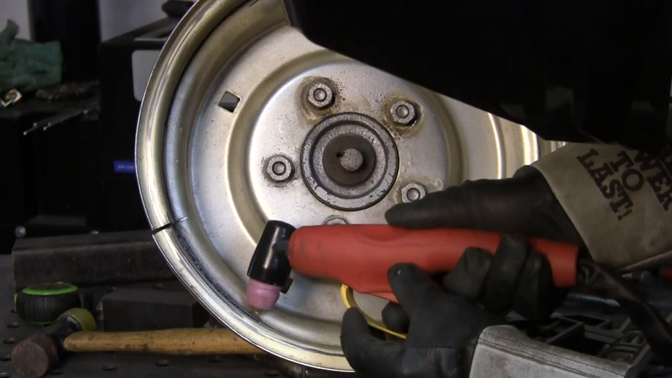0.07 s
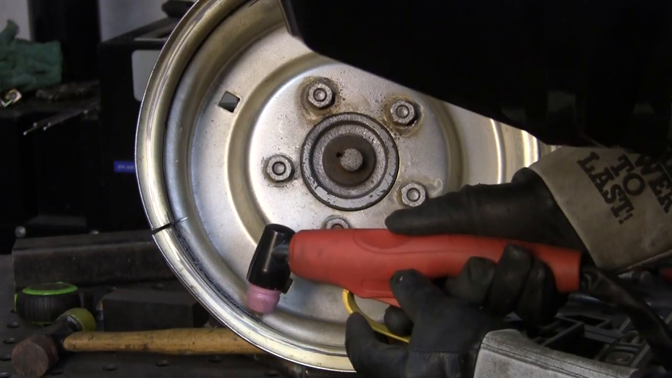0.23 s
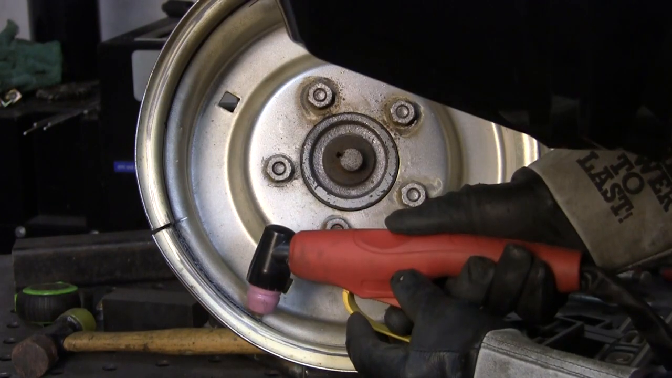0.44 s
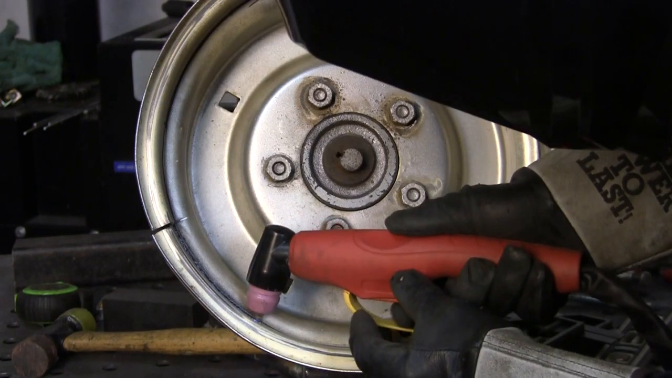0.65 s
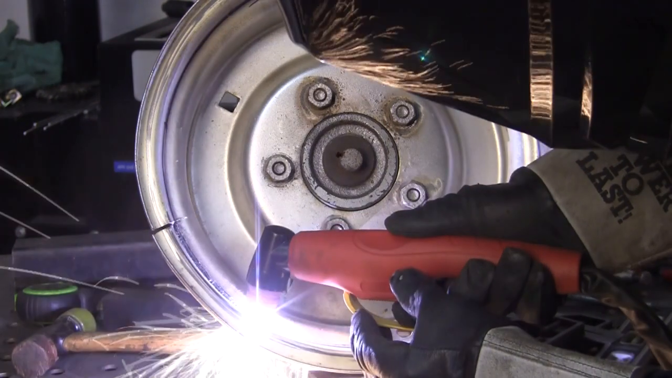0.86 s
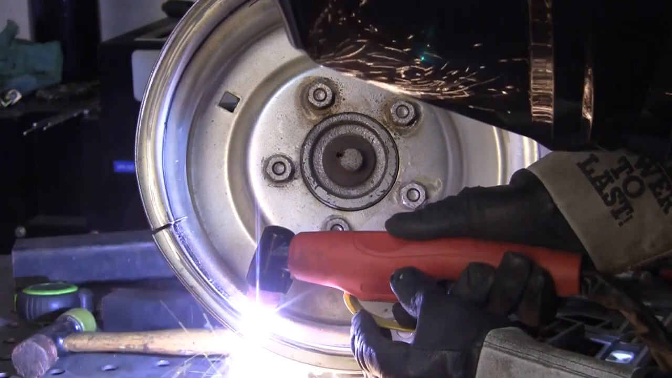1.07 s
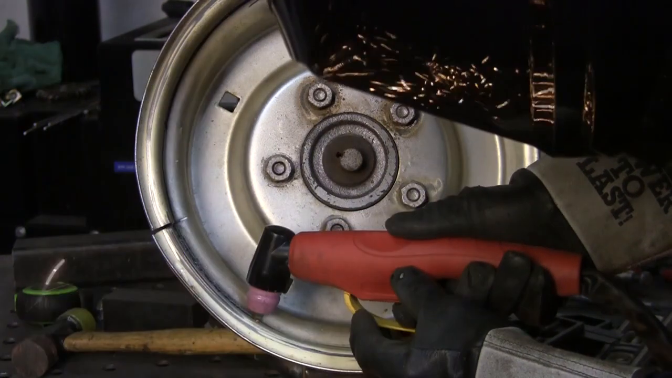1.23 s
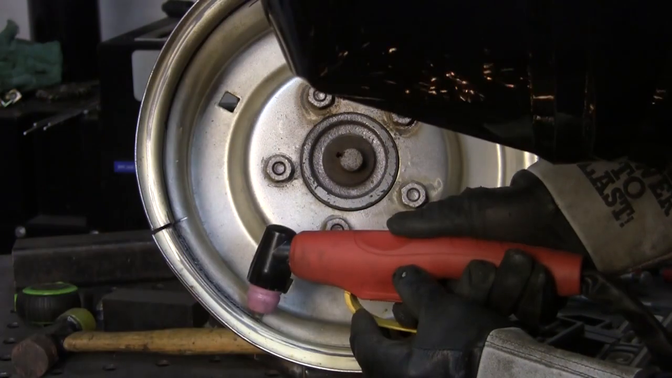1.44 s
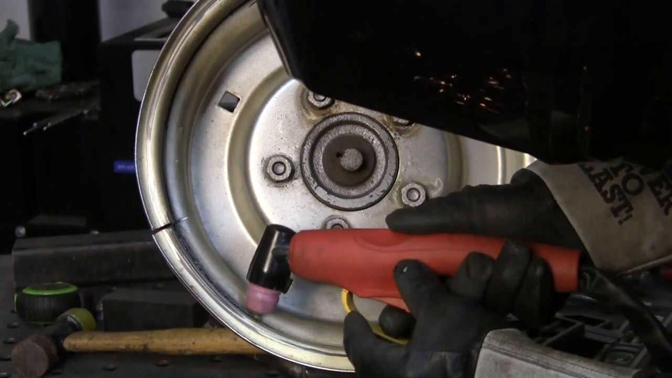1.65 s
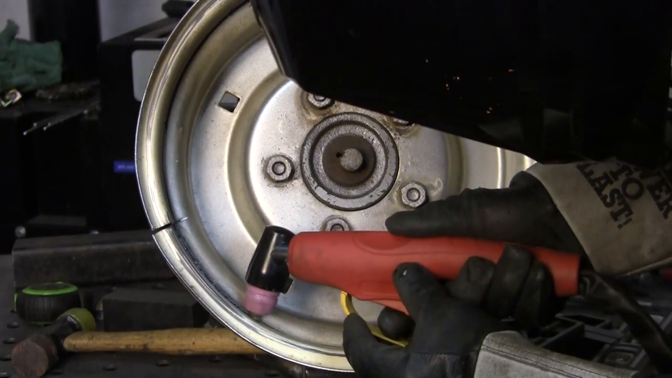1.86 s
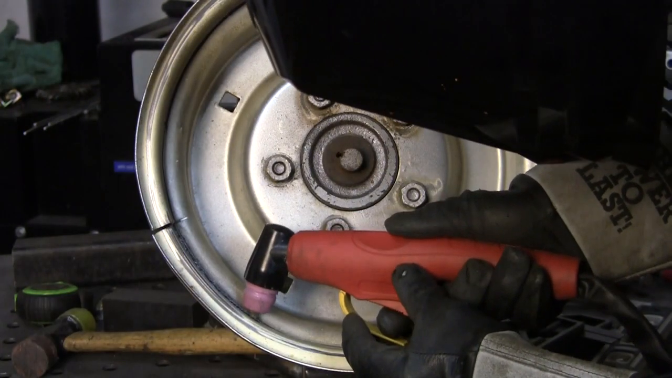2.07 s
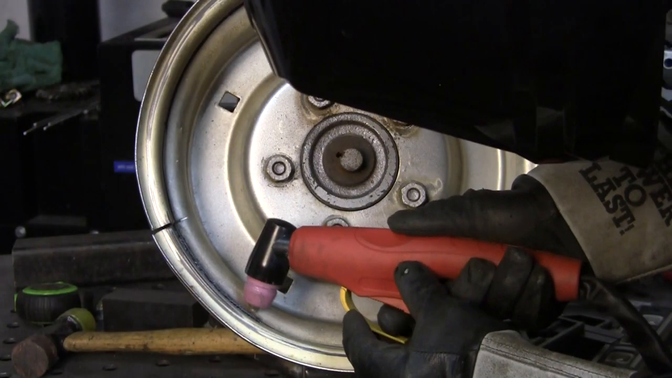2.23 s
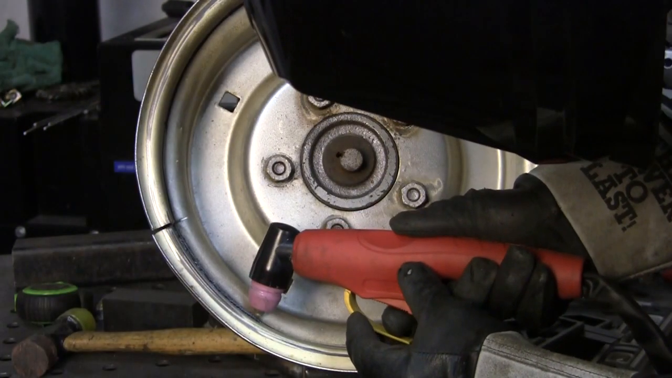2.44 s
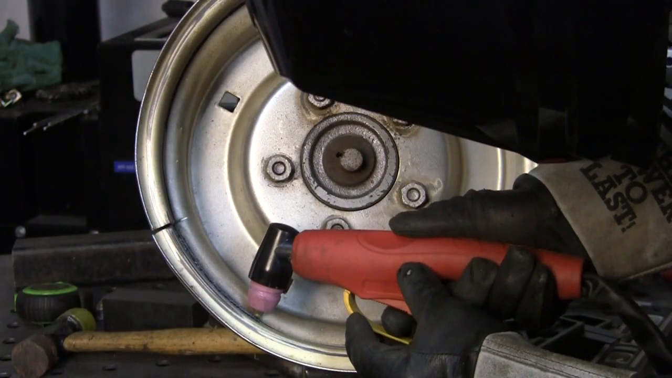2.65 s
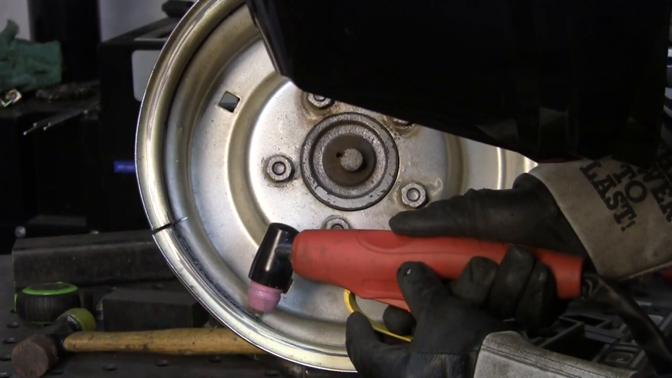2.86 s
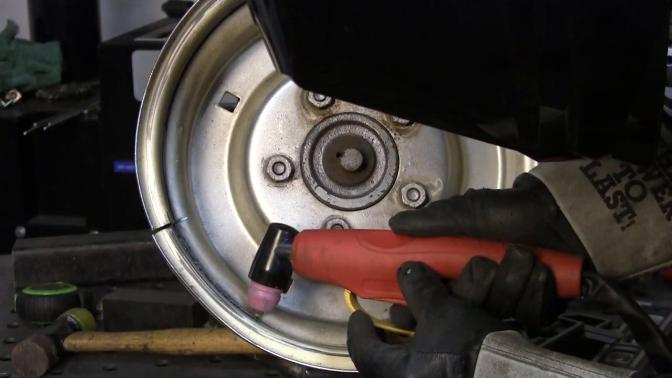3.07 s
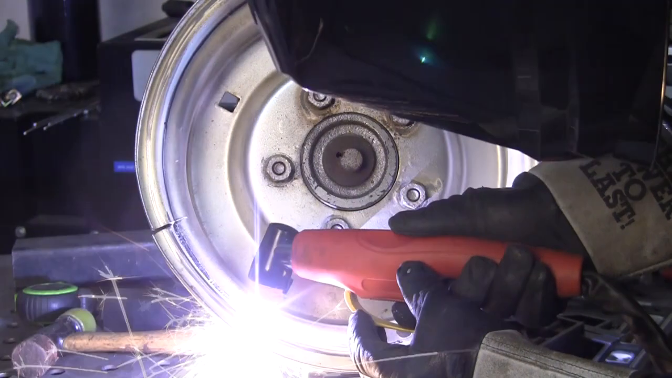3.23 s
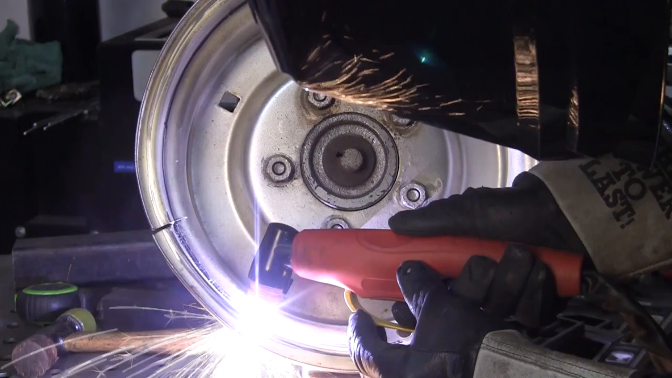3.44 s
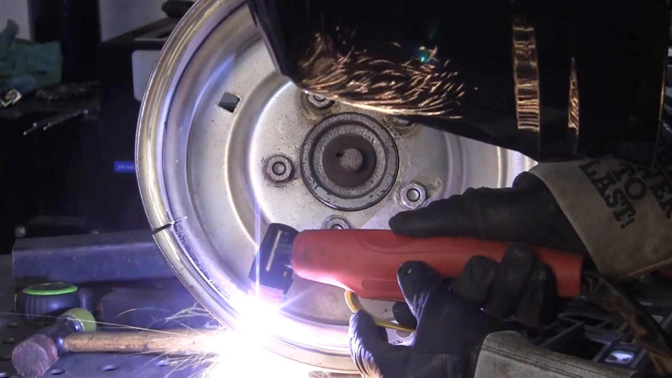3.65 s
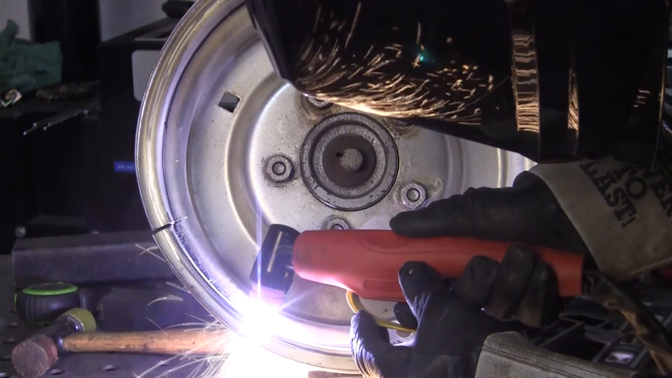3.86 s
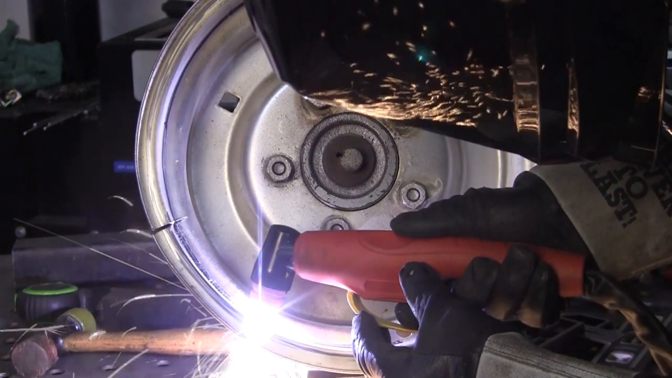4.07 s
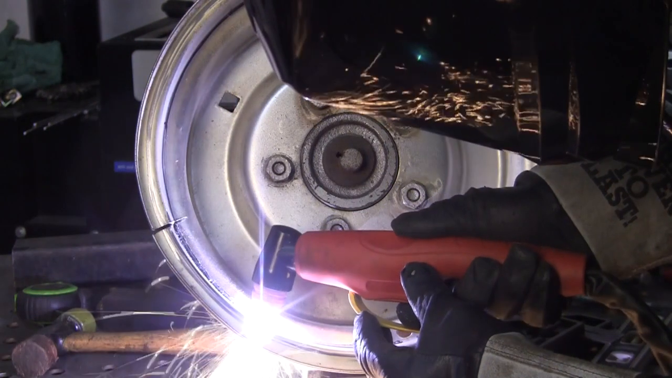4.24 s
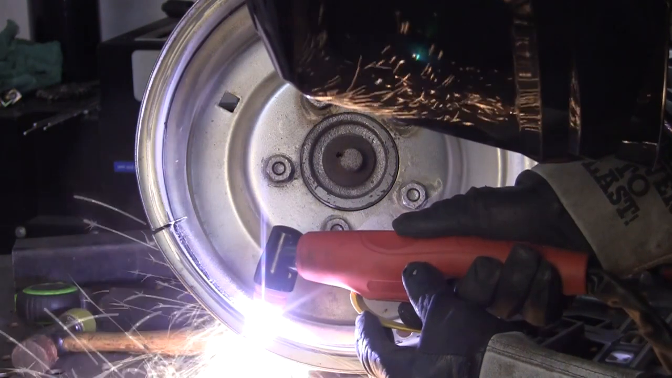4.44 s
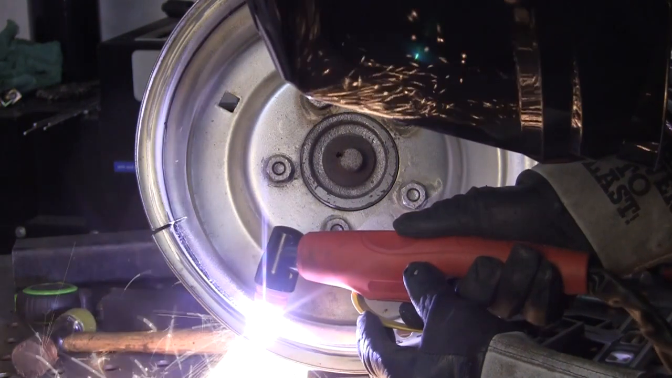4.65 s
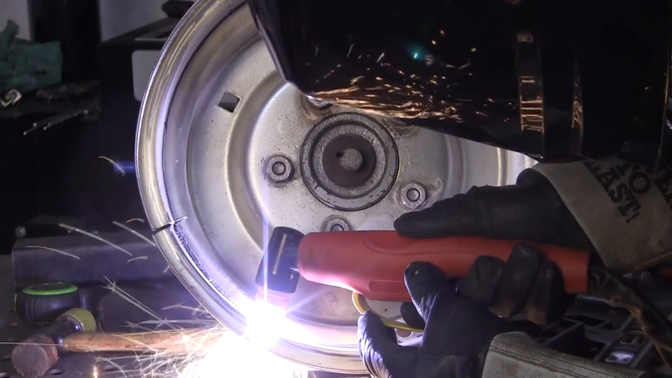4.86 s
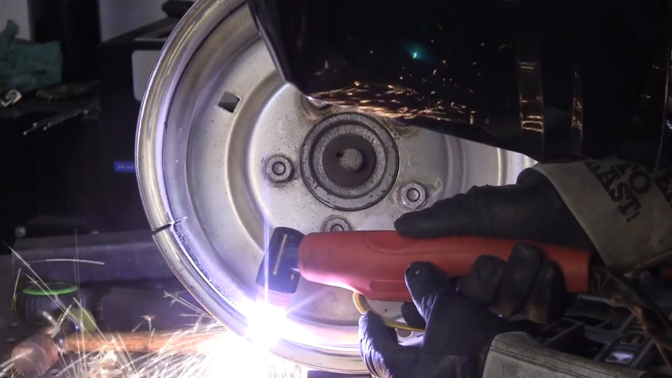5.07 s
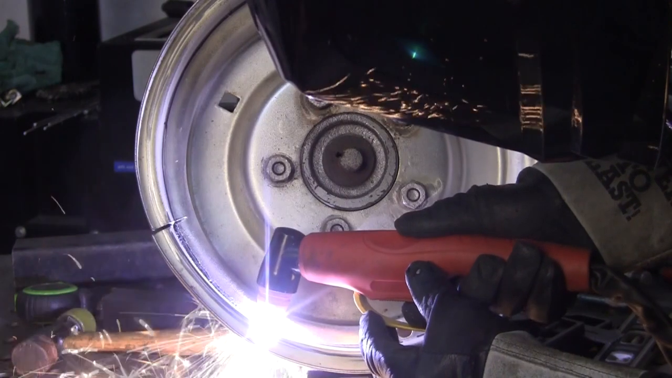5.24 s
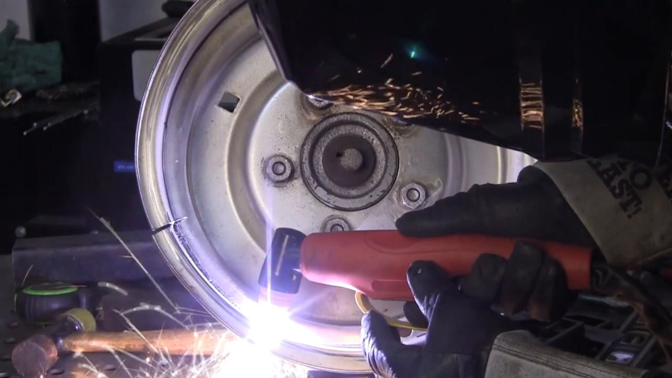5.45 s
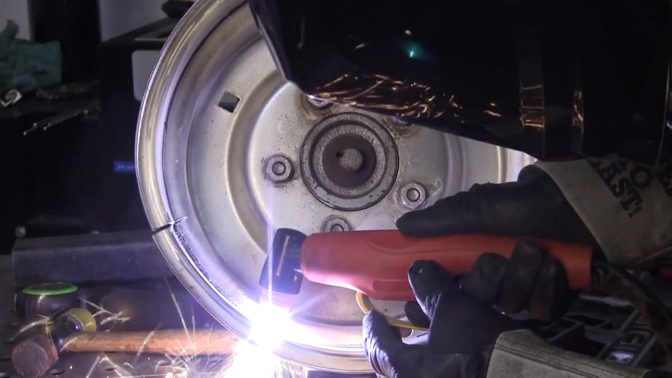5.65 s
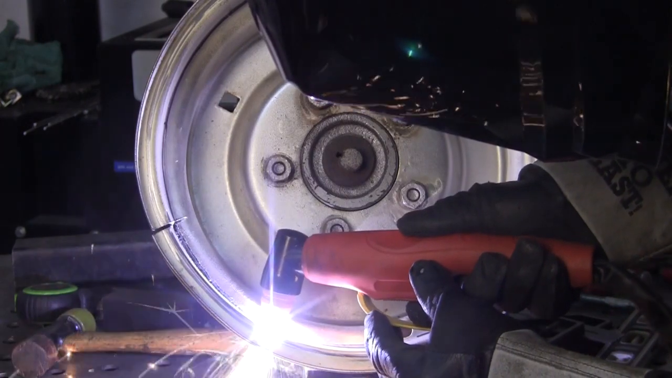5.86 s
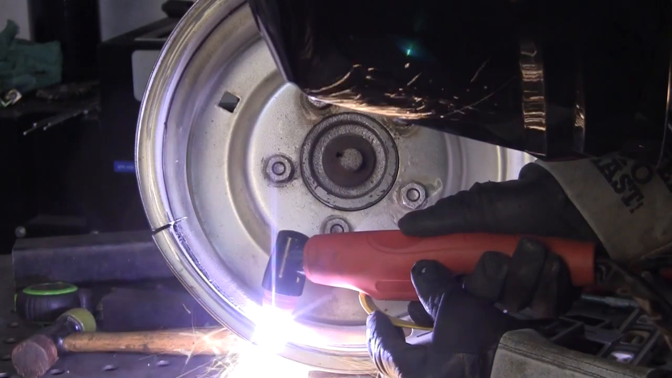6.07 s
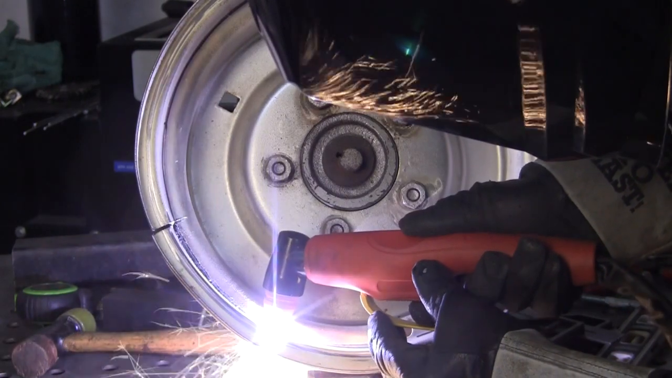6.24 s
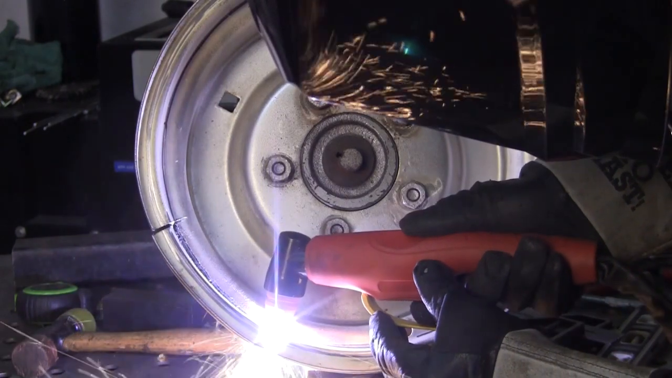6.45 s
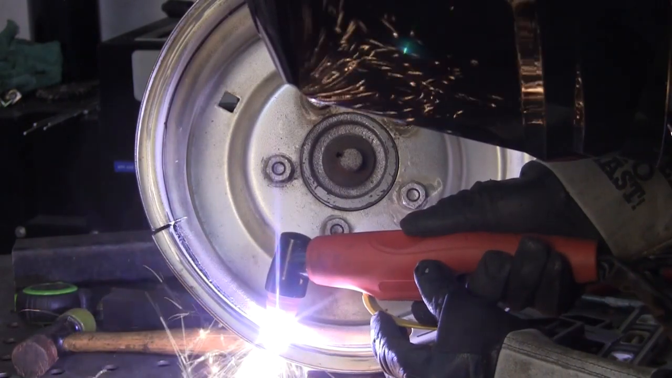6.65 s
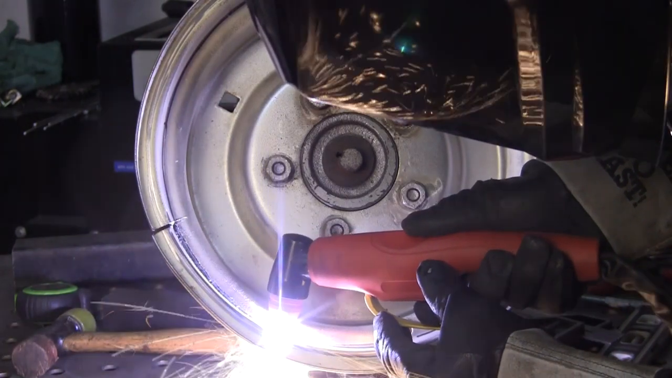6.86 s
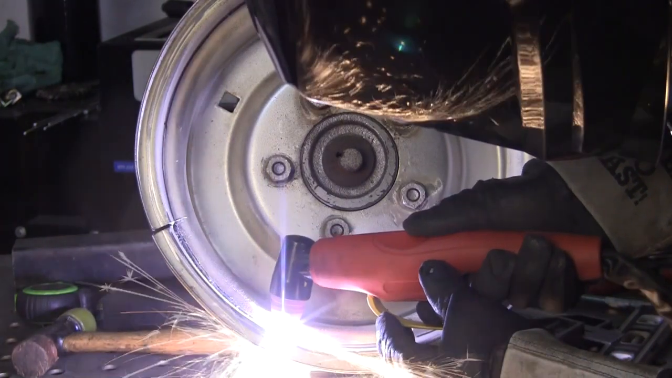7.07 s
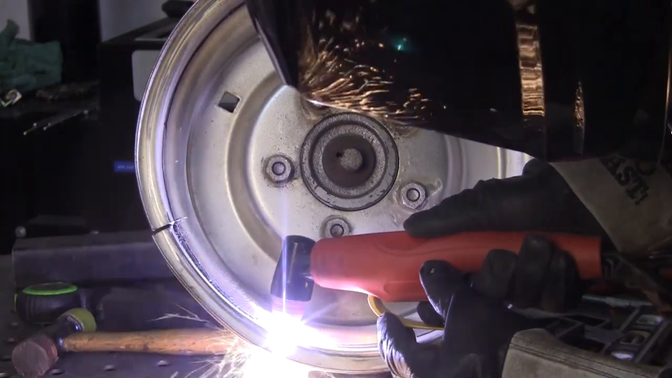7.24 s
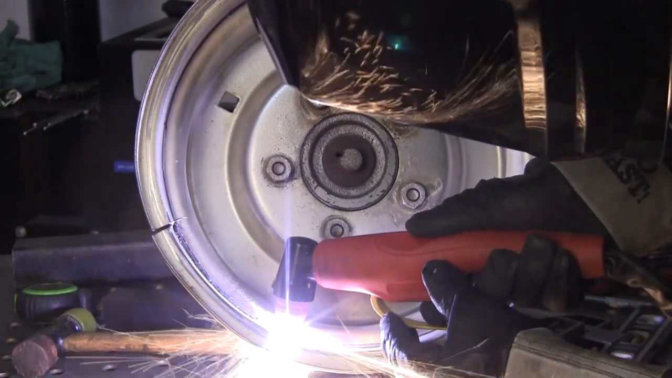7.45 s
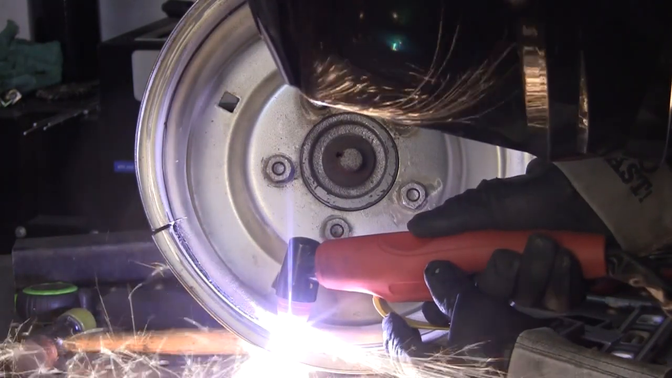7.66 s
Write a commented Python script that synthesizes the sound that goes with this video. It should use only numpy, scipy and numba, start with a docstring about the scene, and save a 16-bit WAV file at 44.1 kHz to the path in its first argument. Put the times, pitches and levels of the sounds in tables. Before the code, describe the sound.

Close in a workshop, compressed air bleeds away, the cutting arc snaps on, drops out, then relights into a harsh continuous hiss.

```python
"""On a workshop bench a plasma torch cuts a steel wheel rim, close to a mono microphone.
Air hisses from the nozzle and dies away; the arc lights, pops out after half a second, then lights again
and cuts steadily. Turbulent air and spattering droplets ring the rim and its hollow; pops are a noise snap
over decaying sines. In the pauses the gain control lifts the cutter's cooling fans: whining tones over
coloured noise."""
import sys
import numpy as np
from scipy import signal
from scipy.fft import rfft, irfft
from scipy.io import wavfile
from scipy.ndimage import uniform_filter1d
from numba import njit

SR = 44100
rng = np.random.default_rng(int(sys.argv[2]) if len(sys.argv) > 2 else 0)


def to_wav(s):
    """Save 16-bit WAV."""
    ch = np.atleast_2d(s).T  # columns
    pcm = np.round(np.clip(ch, -1, 1) * 32767)  # PCM
    wavfile.write(sys.argv[1], SR, pcm.astype(np.int16))


N = 340011
TIME = np.arange(N) / SR
FREQ = np.arange(N // 2 + 1) * SR / N

BLEED_DB = -39  # how far a shut-off jet falls over its bleed time


def undb(db):
    """Decibels to gain."""
    return 10 ** (np.asarray(db) / 20)


def unit(x):
    """Scale to rms 1."""
    return x / np.sqrt(np.mean(x ** 2))


def ramp(x):
    """Hold between 0 and 1."""
    return np.clip(x, 0, 1)


def slope(hz, db):
    """Spectrum points joined on a log-frequency axis, in dB."""
    return np.interp(np.log(FREQ + 1), np.log(hz), db)


def bumps(rows):
    """Resonances as bell-shaped lifts in dB, each down to half its lift at the edges of its width."""
    return sum(db * .5 ** ((2 * (FREQ - centre) / width) ** 2) for centre, width, db in rows)


def colour(x, gain):
    """Filter by a gain for each frequency."""
    return irfft(rfft(x) * gain, N)


def walk(rate):
    """Smooth random motion up to about rate Hz, rms 1."""
    return unit(colour(rng.standard_normal(N), np.exp(-(FREQ / rate) ** 2)))


def workshop(x, wet_db, t60):
    """Bench and walls return a dense, short tail: noise that decays by 60 dB in t60 seconds."""
    t = TIME[:SR // 2]
    tail = rng.standard_normal(len(t)) * np.exp(-np.log(1000) * t / t60)
    echoes = signal.fftconvolve(x, tail / np.linalg.norm(tail))[:N]
    wet = undb(wet_db)
    return (x + wet * echoes) / np.hypot(1, wet)


def fans(waver_db, drift):
    """Blade tones each waver in level on their own and drift in speed together, over the rush of cooling air."""
    # two fans turning at nearly the same speed beat against each other: pitch_hz, relative level_db (rms)
    blade_tones = [(457.6, -29), (466.5, -35.5), (522.2, -43.5), (672.9, -48), (786, -44), (932, -40.5),
                   (1044.5, -41.5), (1066, -48), (1308, -51), (1829.5, -46), (1863, -53), (1976, -57),
                   (2288, -61), (2331, -54), (3688, -59)]
    # spectrum of the cooling air: frequency_hz, relative density_db (per Hz)
    air_colour = [(30, -26), (58, -22), (85, -19), (160, -11), (400, -0.5), (600, -9.5), (1150, -13),
                  (1700, -13), (3000, -23.5), (5500, -29.5), (7200, -31.5), (10000, -42.5), (14000, -47),
                  (15500, -68)]
    # the cutter's case colours that air: centre_hz, width_hz, lift_db
    case_resonances = [(446, 77, 7.5), (790, 280, 8), (2420, 290, 4.5), (3640, 470, 8), (4220, 500, 6),
                       (4970, 400, 9.5), (6450, 350, 5)]
    tones_db, air_db = -9.5, -39

    turn = TIME + np.cumsum(drift * walk(3.2)) / SR
    tones = np.zeros(N)
    for hz, db in blade_tones:
        strength = np.sqrt(2) * undb(db + waver_db * walk(4.6))
        tones += strength * np.sin(2 * np.pi * (hz * turn + rng.random()))
    air_spectrum_db = slope(*np.transpose(air_colour)) + bumps(case_resonances)
    air = unit(colour(rng.standard_normal(N), undb(air_spectrum_db)))
    return undb(tones_db) * tones + undb(air_db) * air


def pops(snap_s, low_hz):
    """Each pop is a sharp snap and a pressure kick that briefly rings the rim's hollow."""
    # the arc catching or blowing out: start_s, thump_db, snap_db, snap_cutoff_hz
    pop_events = [(.772, -25, -23, 8000), (0.782, -42, -17, 12000), (0.847, -9.5, -16, 2000),
                  (1.257, -5.5, -7, 850), (1.2787, -3, -4, 800), (1.2897, -4.5, -5, 1000),
                  (3.2323, -15.5, -8, 2800), (3.2358, -25, -16, 11000), (3.302, -37, -14, 10000),
                  (3.3336, -3, -9, 1100)]
    # what a pop rings with: pitch_hz, level_db, t60_s
    thump_modes = [(161, -21, .07), (345, -3.5, 0.01), (449, -1.5, 0.024), (710, -4, 0.018)]

    t = TIME[:SR // 10]
    thump = np.zeros(len(t))
    for hz, db, t60 in thump_modes:
        thump += undb(db) * np.sin(2 * np.pi * hz * t) * np.exp(-np.log(1000) * t / t60)
    out = np.zeros(N)
    for start_s, thump_db, snap_db, snap_hz in pop_events:
        burst = rng.standard_normal(len(t)) * np.exp(-t / snap_s)
        snap = signal.lfilter(*signal.butter(2, snap_hz, fs=SR), burst)
        start = int(start_s * SR)
        out[start:start + len(t)] += undb(thump_db) * thump + undb(snap_db) * snap
    # the microphone's low cut thins the deep bass of the pops
    out = signal.lfilter(*signal.butter(2, low_hz, "high", fs=SR), out)
    return workshop(out, wet_db=-13.5, t60=0.17)


def air_supply():
    """A valve leaks, then springs open; once shut, the hose bleeds: dB below full flow, full level, treble."""
    # each run of air: open_s, shut_s, bleed_s (time for the hose to bleed down),
    # full_level_db, first_leak_db (below full flow), treble_db (above about 7 kHz, at full flow)
    air_runs = [(-1, .22, 0.61, -15, -20, 2.5), (0.7622, 2.094, 0.37, -16, -22.5, 1.6),
                (3.218, 9, .375, -12.5, -28.5, 1.33)]
    leak_s, open_s = 0.012, 0.016  # leak held, then time constant of opening

    sag_db, full_db, treble_db = np.zeros((3, N))
    for opens, shuts, bleed_s, db, leak_db, bright_db in air_runs:
        opening = leak_db * np.exp(-np.maximum(TIME - opens - leak_s, 0) / open_s)
        # the jet fades ever faster
        bleeding = BLEED_DB * (np.maximum(TIME - shuts, 0) / bleed_s) ** 2
        on = TIME >= opens
        sag_db[on] = (opening + bleeding)[on]
        full_db[on], treble_db[on] = db, bright_db
    return np.maximum(sag_db, -70), full_db, treble_db


def arc():
    """Whether the arc burns, and how deep it has sunk into the steel (0-1)."""
    # each burn of the arc: light_s, out_s
    burns = [(.774, 1.27), (3.232, 9)]
    sink_s = 0.99  # time constant

    burning, depth = np.zeros((2, N))
    for lights, out in burns:
        on = (TIME >= lights) & (TIME < out)
        burning[on] = 1
        depth[on] = 1 - np.exp(-(TIME[on] - lights) / sink_s)
    return burning, depth


def dips():
    """Quick dips of the hiss just after the pops, with a slower recovery, in dB."""
    # bell-shaped dips: centre_s, depth_db, recovery_s
    hiss_dips = [(1.30, -4, .09), (3.312, -6.5, 0.06)]
    onset_s = 0.026

    dips_db = np.zeros(N)
    for centre_s, db, recovery_s in hiss_dips:
        width_s = np.where(TIME < centre_s, onset_s, recovery_s)
        dips_db += db * np.exp(-((TIME - centre_s) / width_s) ** 2)
    return dips_db


def jet_controls(depth):
    """Air pressure, dips, depth of cut and aim set the jet's level, treble, hollow (dB) and stage."""
    sag_db, full_db, bright_db = air_supply()
    weak_db = sag_db + dips()
    # the unlit jet swings once into the rim's hollow
    swing = np.exp(-((TIME - 2.15) / 0.28) ** 2)  # centre and width in s
    # deep in the kerf the jet gains 2.5 dB
    level_db = full_db + weak_db + 2.5 * depth
    # a weak jet is duller, by 0.19 dB of treble per dB of sag
    treble_db = bright_db + 0.19 * sag_db - 0.8 * depth - 5 * swing
    # a weak jet is also more hollow, by up to 9.5 dB once it is down 9 dB
    weak_hollow_db = 9.5 * ramp(weak_db / -9)
    hollow_db = -1.44 + 1.4 * depth + np.maximum(weak_hollow_db, 9 * swing)
    # stage 0 is air alone, 1 piercing, 2 in the kerf; an unlit jet grazes the steel, a burning one sinks in
    graze = 0.47 * (1 - ramp(sag_db / BLEED_DB))
    stage = graze + (2 - graze) * depth
    return level_db, treble_db, hollow_db, stage


def turbulence(flutter_db, flutter_hz):
    """Rushing air: white noise whose strength flutters quickly."""
    return unit(rng.standard_normal(N) * undb(flutter_db * walk(flutter_hz)))


def spatter(per_second, spread_db):
    """Molten droplets bursting: many tiny clicks and a few bigger ones."""
    size = undb(spread_db * np.minimum(rng.exponential(size=N), 5))
    bursts = rng.random(N) < per_second / SR
    return unit(bursts * size * rng.choice([-1, 1], N))


def torch():
    """Air, joined by spatter while the arc burns, drives resonances that shift as the cut deepens."""
    # broad colour of the jet: frequency_hz, air_alone_db, piercing_db, kerf_db
    jet_colour = [(60, -38, -51, -43), (149, -37, -32.5, -32), (337, -7.5, -5.5, -10), (600, -5, -7, -11),
                  (1130, -8, -10, -14.5), (2270, -12.5, -11, -15), (4150, -3.5, -1.5, -4.5),
                  (5920, 3, 3.5, -2.5), (8200, -3, -4.5, -1.5), (8750, -8.5, -6, -10),
                  (12300, -21, -8, -13), (13900, -29, -15, -17.5), (14900, -40.1, -31, -53)]
    # rim, nozzle and kerf: centre_hz, width_hz, air_alone_lift_db, piercing_lift_db, kerf_lift_db
    resonances = [(468, 155, 11.5, 5, 8.5), (692, 82, 1.5, 5.5, 5), (846, 216, 9, 12, 12.5),
                  (1376, 107, 3.5, 12, 11), (1628, 320, 6, 5, 7.5), (2022, 396, 10.5, 7, 11.5),
                  (2412, 140, 10, 8, 8.0), (2607, 296, 12.5, 9.5, 12.5), (2870, 140, 2, 3.3, 7.5),
                  (3080, 215, 5, 5, 8.5), (3577, 220, -1, 6.5, 6), (3795, 250, 1, 1.5, 4),
                  (4060, 92, 1.1, 3.5, 4.5), (4516, 270, 10, 5, 4), (4860, 170, -5, 4, 3.5),
                  (5170, 120, 0, -5.5, 2), (5320, 740, 3.5, 1.7, 5.5), (5730, 151, 5, -5, -4),
                  (6570, 150, 3, -4, -2), (6890, 120, 2.7, 2, 1.5), (7390, 250, 3, 3.5, 2.5),
                  (7760, 480, 4.5, 6, 2.5), (9080, 160, 10, -2, 7), (9590, 210, 9.5, 3, 3),
                  (10020, 75, -9, 1, 8), (11200, 68, 3, 1, 0), (12030, 348, 4, -3, 4)]

    burning, depth = arc()
    level_db, treble_db, hollow_db, stage = jet_controls(depth)
    air = turbulence(flutter_db=0.6, flutter_hz=200)
    droplets = burning * spatter(per_second=700, spread_db=3.0)
    drive = (air + undb(-12) * droplets) * undb(.5 * walk(31))
    drive = workshop(drive, wet_db=-10.5, t60=0.29)

    # blend the three stages of the cut
    hz, *broad = np.transpose(jet_colour)
    centres, widths, *lifts = np.transpose(resonances)
    jet = np.zeros(N)
    for k, (db, lift) in enumerate(zip(broad, lifts)):
        share = np.maximum(1 - abs(stage - k), 0)
        spectrum_db = slope(hz, db) + bumps(zip(centres, widths, lift))
        jet += share * unit(colour(drive, undb(spectrum_db)))

    # falling pressure takes the treble first and leaves a narrower hiss; a jet aimed into the rim
    # roars in its hollow
    treble = colour(jet, 1 - 1 / (1 + (FREQ / 7100) ** 12))
    narrow = colour(jet, np.exp(-((FREQ - 5950) / 450) ** 2))
    hollow = colour(jet, np.exp(-((FREQ - 920) / 330) ** 2))
    jet = (jet + (undb(treble_db) - 1) * treble
           + (undb(-.45 * treble_db) - 1) * narrow
           + (undb(hollow_db) - 1) * hollow)
    return undb(level_db) * jet


def scene():
    """Fans, pops and torch, alike in both channels."""
    cooling = fans(waver_db=1.2, drift=0.00066)
    popping = pops(snap_s=0.0013, low_hz=305)
    return np.tile(cooling + popping + torch(), (2, 1))


@njit
def follow(wanted, attack_s, release_s):
    """Slew a gain in dB: quickly down, slowly up."""
    out, g = np.empty(len(wanted)), 0.
    for i in range(len(wanted)):
        time_s = attack_s if wanted[i] < g else release_s
        g += (wanted[i] - g) / (SR * time_s)
        out[i] = g
    return out


def gain_control(x, target_db, most_db, attack_s, release_s):
    """Hold the level near a target; quiet stretches are slowly lifted, by most_db at most."""
    power = np.abs(uniform_filter1d(x ** 2, size=500))  # averaged over about 11 ms
    heard_db = 10 * np.log10(power + 1e-12)
    wanted_db = np.minimum(target_db - heard_db, most_db)
    return x * undb(follow(wanted_db, attack_s, release_s))


def record(dry):
    """The close mono microphone's chain: automatic gain, rounded peaks and a steep top cut."""
    held = gain_control(dry[0], target_db=-13.0, most_db=14.5, attack_s=0.0014, release_s=0.38)
    rounded = held / (1 + (held / .85) ** 4) ** .25  # peaks bend over towards 0.85
    top_cut = signal.ellip(8, .2, 70, 15600, fs=SR, output="sos")
    return np.tile(signal.sosfilt(top_cut, rounded), (2, 1))


dry = scene()
out = record(dry)
to_wav(out)
```